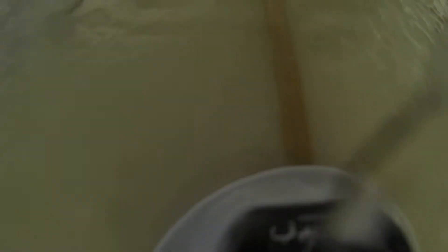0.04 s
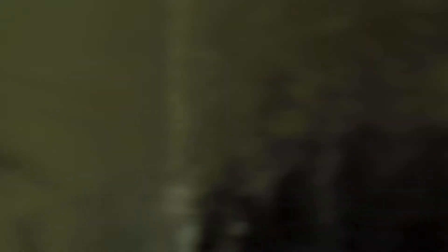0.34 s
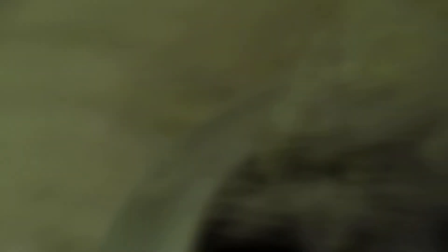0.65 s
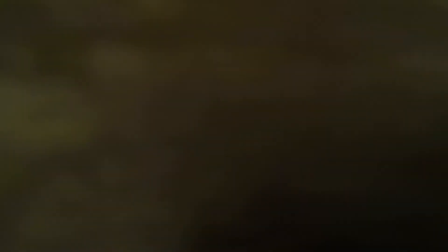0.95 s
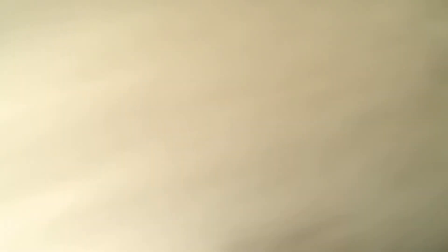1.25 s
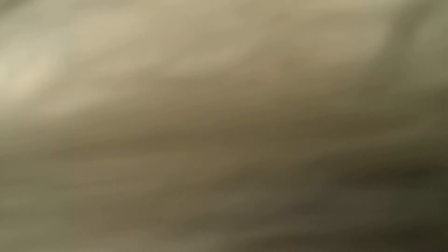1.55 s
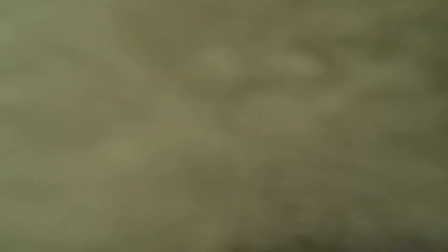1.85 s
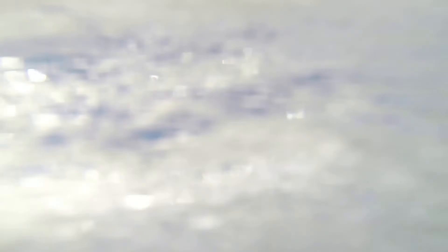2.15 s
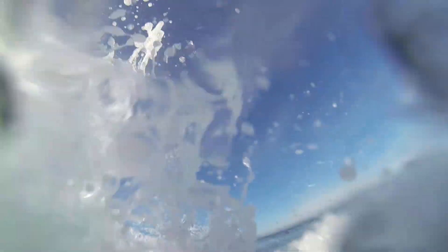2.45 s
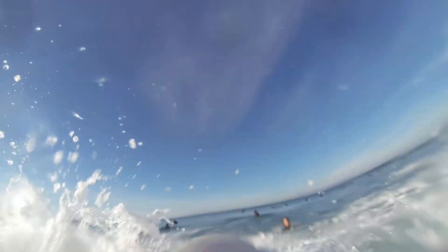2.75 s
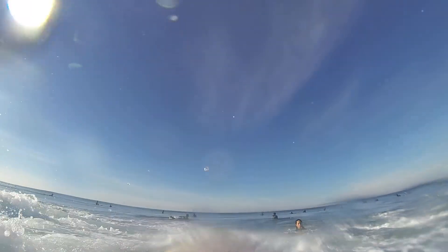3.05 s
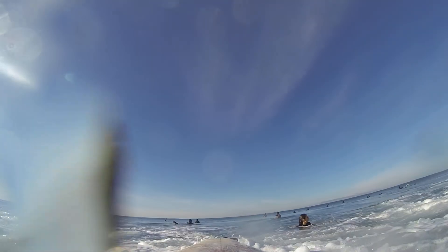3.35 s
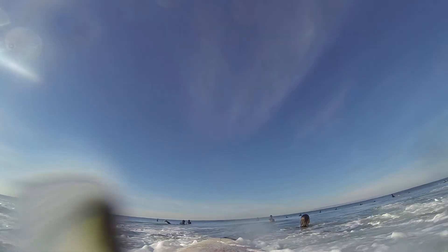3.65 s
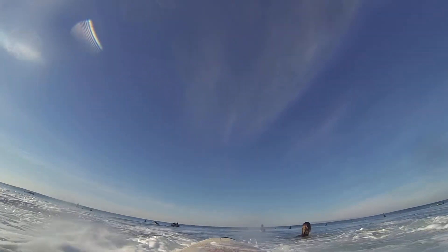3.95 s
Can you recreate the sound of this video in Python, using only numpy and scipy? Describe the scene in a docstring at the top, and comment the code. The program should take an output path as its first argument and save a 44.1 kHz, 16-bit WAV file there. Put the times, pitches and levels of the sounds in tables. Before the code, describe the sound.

Muffled underwater churning with crackling foam and dull thumps, settling to a low shuddering rumble.

```python
"""A low shudder, a gurgle and dull thumps: a camera in a waterproof housing tumbles through a wave.
Its mount shakes throughout, swirls of water buffet the shell and lumps of water thump it.
From about 0.3 s foam crackles on the shell, air pockets burst and bubbles ring.
After 2.4 s it surfaces with a few last splashes, leaving the shudder and the muffled wash of surf."""
import sys
import numpy as np
from scipy import signal
from scipy.fft import rfft, irfft, next_fast_len
from scipy.io import wavfile
from scipy.ndimage import uniform_filter1d, map_coordinates

SR = 44100
rng = np.random.default_rng(int(sys.argv[2]) if len(sys.argv) > 2 else 0)


def generate_wav(signal):
    """Clip the signal to [-1, 1] and save it as 16-bit WAV at the path in sys.argv[1]."""
    frames = np.transpose(np.atleast_2d(signal))
    scaled = np.clip(frames, -1, 1) * 32767
    pcm = np.round(scaled).astype(np.int16)
    wavfile.write(sys.argv[1], SR, pcm)


N = 176400  # 4 s
T = np.arange(N) / SR


def amp(db):
    """Turn decibels into a number to multiply by."""
    return 10 ** (np.asarray(db) / 20)


def unit(x):
    """Scale x to an average power of 1."""
    return x / np.sqrt(np.mean(x ** 2) + 1e-20)


def curve(rows):
    """Join (time, value) points with straight lines, one value per sample."""
    return np.interp(T, *np.transpose(rows))


def wobble(rate):
    """A smooth curve through `rate` random values a second."""
    return map_coordinates(rng.standard_normal(int(N * rate / SR) + 4), [T * rate])


def colour(x, points):
    """Shape the bass and treble of x to follow (frequency, level) points."""
    size = 2 * next_fast_len(N // 2 + SR // 4)
    hz, db = np.transpose(points)
    log_hz = np.log(np.fft.rfftfreq(size, 1 / SR) + 1)
    gain = amp(np.interp(log_hz, np.log(hz + 1), db))
    cepstrum = irfft(np.log(np.maximum(unit(gain), 1e-6)), size)
    # make the filter ring only after a hit, never before it
    cepstrum[1:size // 2] *= 2
    cepstrum[size // 2 + 1:] = 0
    return irfft(rfft(x, size) * np.exp(rfft(cepstrum)), size)[:N]


def patchy(x, depth_db):
    """Make x louder and softer in random patches of time and pitch."""
    spectrum = signal.stft(x, nperseg=512)[2]
    patches = uniform_filter1d(rng.standard_normal(spectrum.shape), size=8, axis=0)
    patches = uniform_filter1d(patches, size=6, axis=1)
    return signal.istft(spectrum * amp(depth_db * unit(patches)), nperseg=512)[1][:N]


def grains(per_s, spread_db):
    """Tiny hits at random times, a few much larger than the rest; equally strong at any rate."""
    size = amp(spread_db * np.minimum(rng.exponential(size=N), 4))
    hits = rng.random(N) < per_s / SR
    return unit(hits * size * rng.choice([-1, 1], N) / np.sqrt(per_s))


def small_bubbles(per_s, centre_hz, life_cycles):
    """Small bubbles ring briefly at random times, each rising a little in pitch."""
    pitch_spread, pitch_rise = 0.236, 0.066
    draw = rng.standard_normal((int(per_s * N / SR), 2))  # a random pitch and loudness each
    start = rng.integers(0, N, (len(draw), 1))
    samples = np.arange(SR // 40)
    cycles = centre_hz * np.exp(pitch_spread * draw[:, :1]) * samples / SR
    age = cycles / life_cycles
    level = amp(6.9 * draw[:, 1:] - 24 * age) * (1 - np.exp(-cycles))
    ring = level * np.sin(2 * np.pi * cycles * (1 + pitch_rise * age / 2))
    return unit(np.bincount((start + samples).ravel(), ring.ravel(), N)[:N])


# how hard the mount swings (time [s], level [dB])
SWING_LEVEL = [(0, -16.5), (.28, -15), (.35, -38), (.5, -31), (.75, -20), (.95, -14), (1.02, -30.5),
               (1.07, -17.5), (1.6, -18), (1.7, -24), (1.95, -16), (2.08, -22.5), (2.68, -22), (2.81, -15),
               (2.91, -17.5), (3.09, -13), (3.2, -27.5), (3.24, -16), (3.42, -17), (3.48, -9),
               (3.555, -22.5), (3.62, -13), (3.68, -22.5), (3.83, -6), (4, -8)]
# how fast it swings (time [s], rate [Hz])
SWING_RATE = [(0, 44.67), (.8, 43.8), (1.25, 39.08), (1.5, 48.33), (1.8, 37.8), (2.5, 31.94), (4, 33.3)]

def shudder():
    """The mount swings at its lowest natural note, unsteadily while the water tosses it."""
    tossing = curve([(.26, 1), (.3, 0.84), (2.3, 0.88), (2.5, 0.071)])
    phase = 2 * np.pi * np.cumsum(curve(SWING_RATE)) / SR + tossing * wobble(40)
    level = amp(curve(SWING_LEVEL) + 2 * tossing * wobble(45))
    return level * np.sqrt(2) * np.sin(phase)


# gurgles of moving water (start [s], length [s], pitch [Hz], level [dB])
GURGLES = [(0.0, .29, 146.7, -28), (0.385, .27, 202.6, -23), (0.514, 0.038, 1039, -22),
           (.627, .04, 195, -18.5), (0.664, 0.035, 1019, -20.5), (2.223, .21, 333, -37),
           (2.75, .055, 430, -39), (2.721, .64, 205, -38), (2.913, .35, 345, -44), (3.239, .04, 520, -40),
           (3.302, .03, 250, -31), (3.351, .11, 790, -41)]

def gurgles():
    """Moving water makes hollow, wavering notes that swell and fade; shorter ones are noisier."""
    out = np.zeros(N)
    for start, length, hz, db in GURGLES:
        progress = np.clip((T - start) / length, 0, 1)
        swell = np.sqrt(np.abs(np.sin(np.pi * progress)))
        width_hz = 50 + 9 / length
        cycles = np.cumsum(hz * (1 + .07 * wobble(10))) / SR  # the pitch wanders by about 7%
        band = (wobble(width_hz) + 1j * wobble(width_hz)) * np.exp(2j * np.pi * cycles)
        out += amp(db) * swell * unit(band.real)
    return out


# how hard swirling water presses on the shell (time [s], level [dB])
SWIRL_LEVEL = [(0, -36), (.26, -46), (.29, -12), (.33, -30.5), (.48, -26.5), (.54, -13.5), (.7, -22),
               (.94, -22), (.99, -37), (1.06, -29), (1.2, -29), (1.54, -21.5), (1.72, -27), (1.99, -18.5),
               (2.05, -30), (2.2, -20.5), (2.235, -18), (2.45, -35.5), (3.3, -41.5), (3.76, -48.5),
               (3.82, -29.5), (3.92, -43)]
# its deep tone (frequency [Hz], level [dB])
SWIRL_TONE = [(30, -14.5), (60, 3), (95, 1.5), (190, -9), (300, -11.5), (900, -36.5), (2500, -62)]

def swirls():
    """Swirling water buffets the shell with a low, lumpy rumble."""
    lumps = grains(per_s=900, spread_db=4.5)
    return amp(curve(SWIRL_LEVEL)) * unit(colour(lumps, SWIRL_TONE))


# surf around the housing (time [s], level [dB])
SURF_LEVEL = [(0, -50), (2.73, -45.5), (2.775, -36.5), (2.84, -47.5), (2.96, -40), (3.55, -39.5),
              (3.68, -37), (3.86, -36.5), (4, -46)]
# its muffled tone (frequency [Hz], level [dB])
SURF_TONE = [(150, -25), (203, -2.5), (260, -11.5), (339, -8), (426, -15.5), (525, -7.5), (647, -19),
             (795, -10), (1000, -21), (1480, -11.5), (2400, -28), (3250, -26.5), (4320, -42), (14000, -63)]

def surf():
    """White water laps around the housing in patches, while fine spray ticks on the shell."""
    wash = patchy(grains(per_s=3000, spread_db=5.5) + rng.standard_normal(N), depth_db=2.5)
    ticks = amp(-25.5) * small_bubbles(per_s=220, centre_hz=4400, life_cycles=10)
    return amp(curve(SURF_LEVEL)) * (unit(colour(wash, SURF_TONE)) + ticks)


# lumps of water hitting the shell (time [s], push [dB], half width [s], swing back [share of push])
THUMPS = [(0.061, -8.5, 0.0025, 0.12), (0.147, -8, 0.0032, 0.12), (0.193, -10.5, 0.0045, .1),
          (0.279, 2.5, 0.000895, 0.45), (0.297, -3.5, 0.00058, 0.39), (1.187, -7, 0.0012, 1),
          (2.007, 4, 0.0008, 0.29), (2.229, -4.5, 0.00233, 0.19), (2.247, -3, 0.0012, 0.5),
          (2.337, -1.5, 0.0019, 0.076), (2.518, -14, 0.0012, 0.42), (2.5602, 1.5, 0.00091, 0.46),
          (2.79, -7.5, 0.00284, 0.37)]

def thumps():
    """Each lump of water pushes the shell in, and the shell swings back."""
    out = np.zeros(N)
    for time, db, half_width, share in THUMPS:
        offset = (T - time) / half_width
        push = np.exp(-np.abs(offset) ** 1.3)
        swing_back = np.exp(-np.abs(offset - 3.57) ** 1.3)  # 3.57 half widths later
        out += amp(db) * (share * swing_back - push)
    return out


# foam rushing over the shell (time [s], level [dB])
FOAM_LEVEL = [(.272, -48), (.284, -29), (.4, -36), (.425, -25), (.62, -23), (.675, -18.5), (.73, -21.5),
              (.92, -18.5), (.96, -30.5), (1.005, -35.5), (1.02, -28.5), (1.1, -27), (1.155, -36.5),
              (1.205, -25.5), (1.285, -30), (1.308, -42), (1.325, -26), (1.365, -19), (1.39, -34.5),
              (1.455, -35), (1.54, -31), (1.61, -27), (1.635, -40.5), (1.65, -26.5), (1.76, -25.5),
              (1.83, -19.5), (1.98, -17), (2.02, -35), (2.1, -25), (2.255, -23), (2.28, -31.5), (2.42, -36),
              (2.44, -51), (2.56, -41.5), (2.66, -61)]
# its tone, heard through the shell (frequency [Hz], level [dB])
SHELL_TONE = [(240, -31), (400, -9.5), (697, -6), (1100, -4), (1590, 0), (2700, -15), (3430, -10.5),
              (4360, -23.5), (5140, -18.5), (5800, -29), (6540, -23), (7260, -28), (11200, -38.5),
              (14500, -53)]
# fine fizz within the foam (time [s], level compared with the foam [dB])
FIZZ_LEVEL = [(.3, -33), (.45, -19.5), (1.1, -20.5), (1.35, -16), (1.6, -25), (1.85, -17), (2.05, -21.5),
              (2.4, -16.5)]
# the bright tone of the fizz (frequency [Hz], level [dB])
FIZZ_TONE = [(1500, -35.5), (3500, 6), (5800, -5.5), (7000, -6.5), (10500, -9.5), (13500, -19),
             (15200, -51)]

def foam():
    """Frothy water crackles on the shell: a dense rush in the surges, separate spatters in the lulls."""
    level_db = curve(FOAM_LEVEL)
    hits_per_s = 4500 * amp(1.05 * np.maximum(level_db - level_db.max(), -20))
    crackle = grains(hits_per_s, spread_db=3.5) + amp(-4) * rng.standard_normal(N)
    rush = unit(colour(patchy(crackle, depth_db=1.5), SHELL_TONE))
    bubbles = amp(-9.5) * small_bubbles(per_s=170, centre_hz=1546, life_cycles=15)
    fizz = amp(curve(FIZZ_LEVEL)) * unit(colour(grains(hits_per_s, spread_db=5.5), FIZZ_TONE))
    flutter_db = 1.56 * wobble(110)
    return amp(level_db + flutter_db) * (rush + bubbles + fizz)


# air pockets and drops bursting on the shell
# (start [s], level [dB], time to fade by 60 dB [s], bright spray compared with that level [dB])
BURSTS = [(.276, -16.5, 0.011, -29), (.291, -4.5, 0.0076, -30), (.572, -5.5, 0.0087, -17),
          (0.753, -7.5, 0.016, -30), (0.879, -8, 0.0065, -1.5), (1.185, -8, 0.043, -12),
          (1.313, -12.5, 0.0076, -31.5), (1.422, -14.5, 0.013, -8.5), (1.475, -12, 0.011, -16.5),
          (1.492, -1.5, 0.0097, -19.5), (1.503, -7, 0.05, -22.5), (1.523, -10, 0.11, -26),
          (1.534, -15, 0.024, -6), (1.570, -14, 0.06, -40), (2.326, -17, 0.032, -38),
          (2.519, -17, 0.025, -18), (2.544, -25.5, .04, -19), (2.5598, -0.5, 0.016, -19),
          (2.625, -28, 0.069, -12.5), (2.79, -45, .015, 1)]

def bursts():
    """Air pockets collapse in brief puffs of noise, some dull and some sharp."""
    attack_s = 0.00033
    body, spray = np.zeros((2, N))
    for start, db, fade_s, spray_db in BURSTS:
        age = np.maximum(T - start, 0)
        level = amp(db - 60 * np.minimum(age / fade_s, 2)) * (1 - np.exp(-age / attack_s))
        body += level
        spray += level * amp(spray_db)
    dull = colour(body * rng.standard_normal(N), SHELL_TONE)
    sharp = colour(spray * rng.standard_normal(N), FIZZ_TONE)
    return dull + sharp


# single large bubbles (start [s], starting pitch [Hz], level [dB], time to fade by 60 dB [s])
LARGE_BUBBLES = [(0.292, 1860, -8.5, 0.0066), (.573, 1810, -13, 0.0077), (0.784, 1790, -10, .045),
                 (0.878, 1830, 2.5, 0.0073), (1.079, 1400, -15.5, 0.025), (1.430, 2170, -20.5, 0.03),
                 (2.97, 1880, -27, .022), (3.648, 859.5, -34.5, .09), (3.928, 823, -34, .13)]

def large_bubbles():
    """Large bubbles snap or ring, their pitch sagging and shaken by the flow."""
    sag = 0.28  # share of the pitch lost over the fade time
    out = np.zeros(N)
    for start, hz, db, fade_s in LARGE_BUBBLES:
        age = np.clip(T - start, 0, 2 * fade_s)
        swell = 1 - np.exp(-(age / 0.0008) ** 2)
        cycles = hz * age * (1 - sag * age / fade_s / 2)
        phase = 2 * np.pi * cycles + 1.75 * wobble(10 / fade_s)
        out += amp(db - 60 * age / fade_s) * 2 * swell * np.sin(phase)
    return out


def scene():
    """Add all the sounds together in one channel."""
    mix = shudder() + gurgles() + swirls() + surf() + thumps() + foam() + bursts() + large_bubbles()
    return mix[None]


def record(dry):
    """The camera flattens peaks that are too loud for it and drops the highest treble."""
    top_hz = 15200
    size = next_fast_len(N + SR // 2)
    spectrum = rfft(np.clip(dry, -1, 1), size)
    kept = np.fft.rfftfreq(size, 1 / SR) < top_hz
    return irfft(spectrum * kept, size)[:, :N]


dry = scene()
out = record(dry)
generate_wav(out)
```